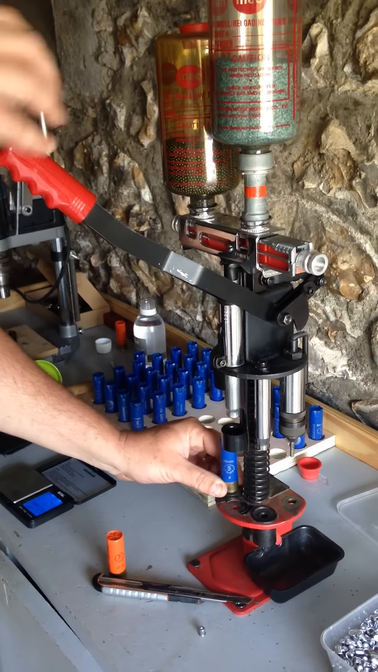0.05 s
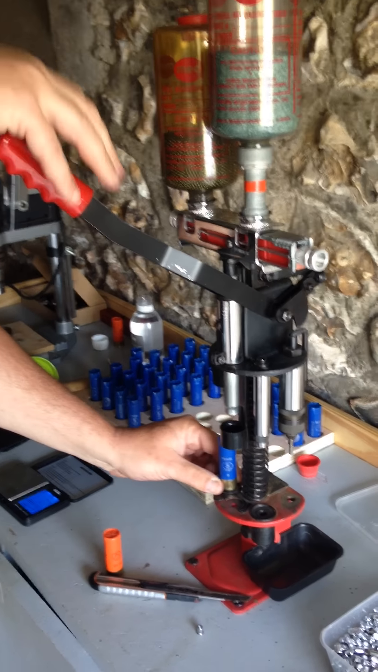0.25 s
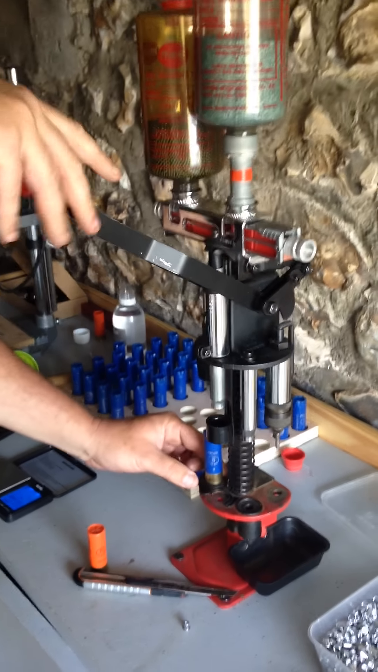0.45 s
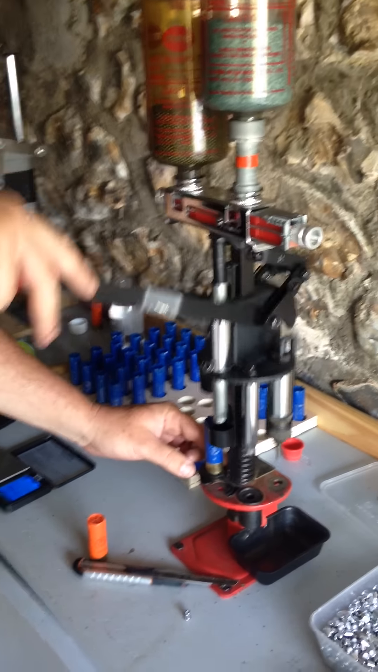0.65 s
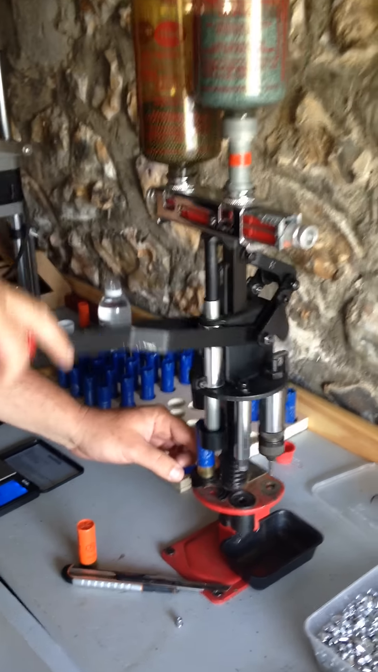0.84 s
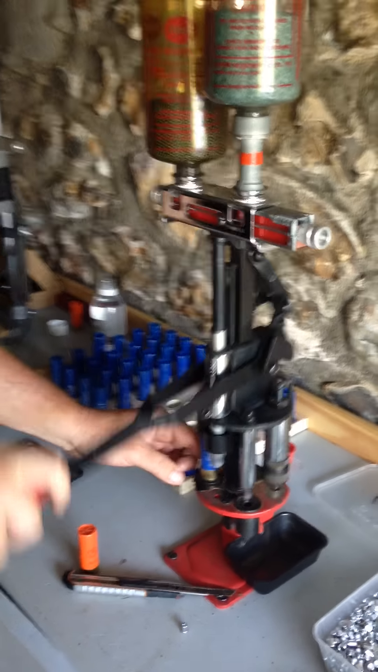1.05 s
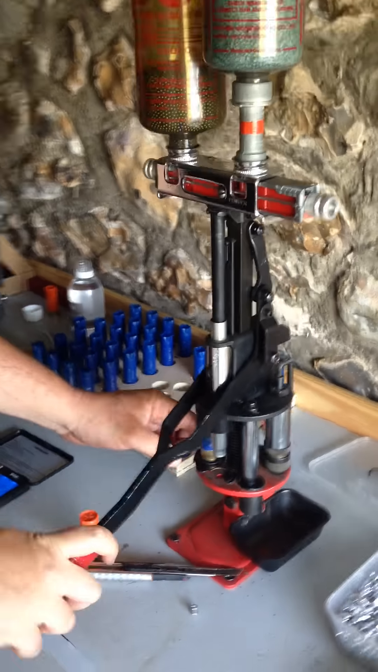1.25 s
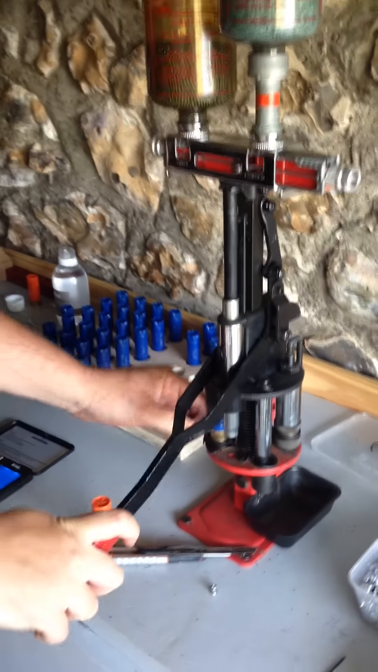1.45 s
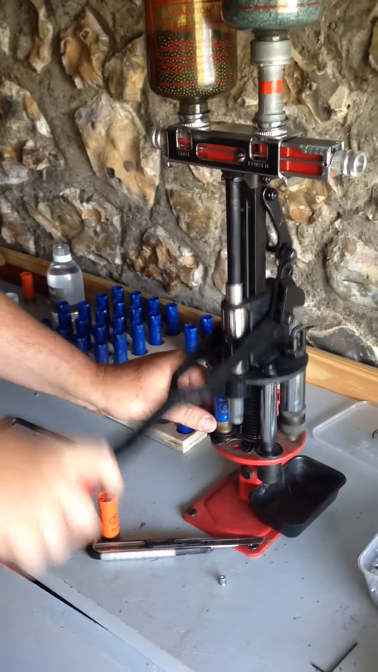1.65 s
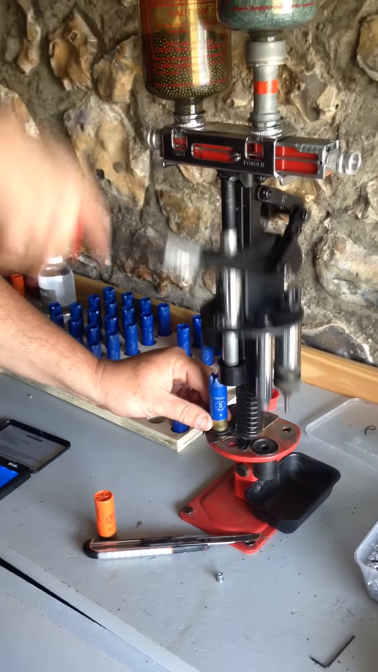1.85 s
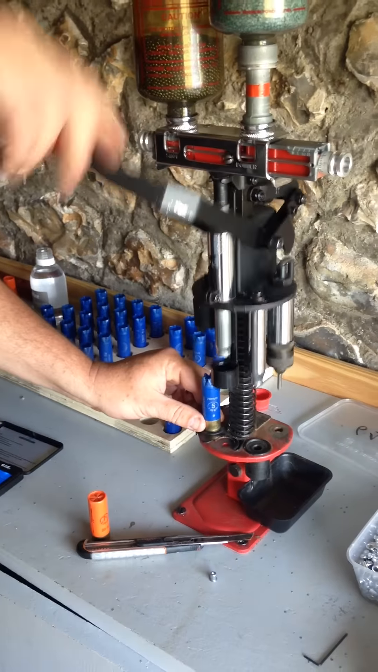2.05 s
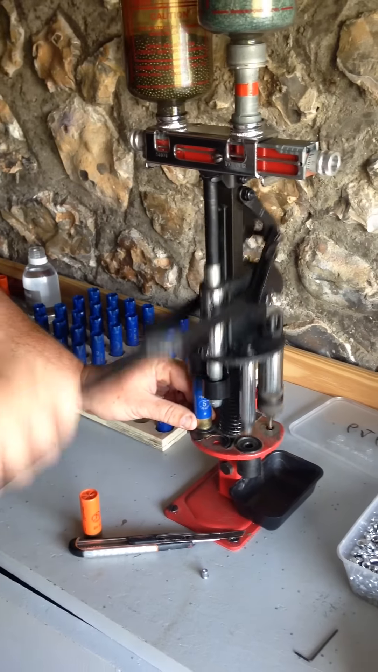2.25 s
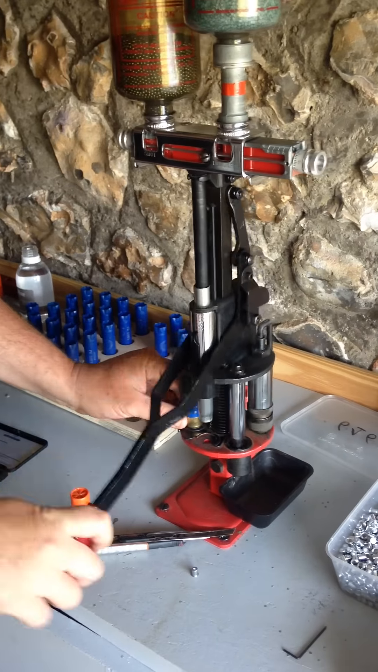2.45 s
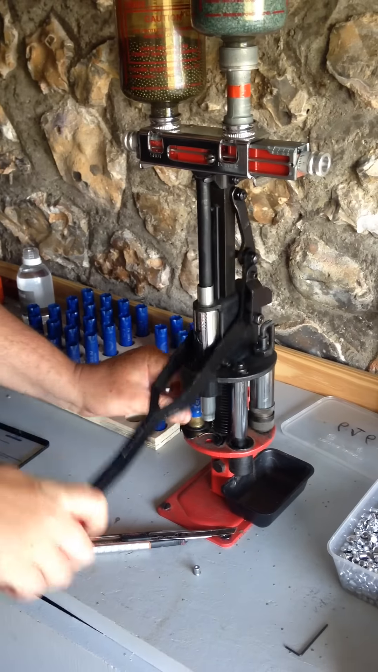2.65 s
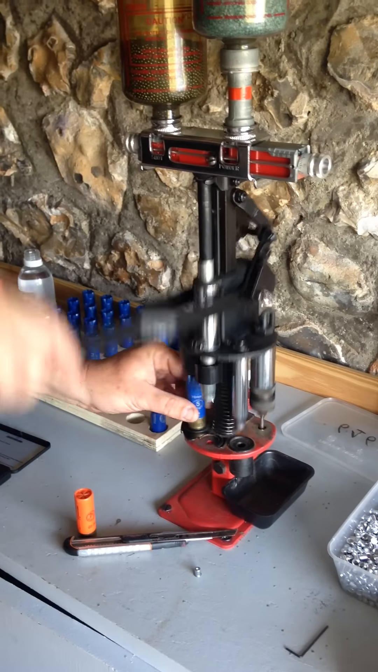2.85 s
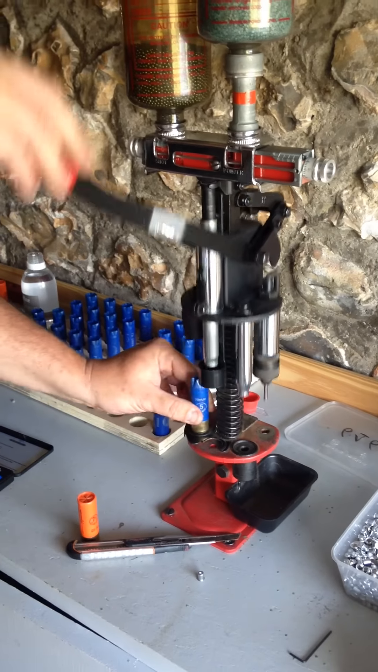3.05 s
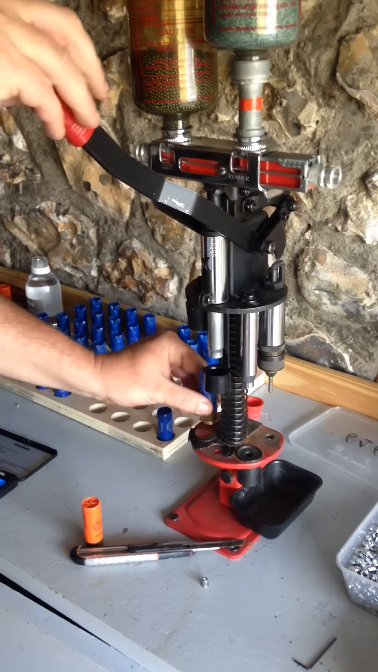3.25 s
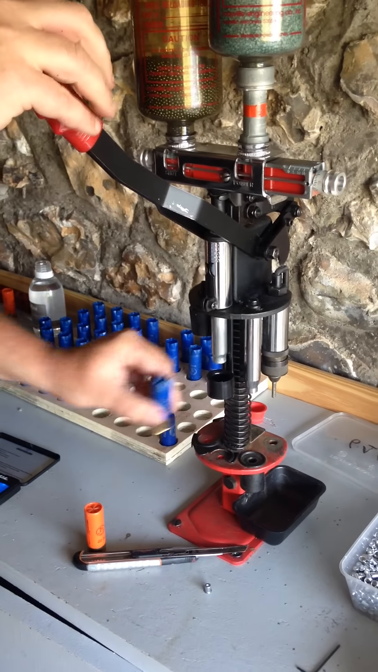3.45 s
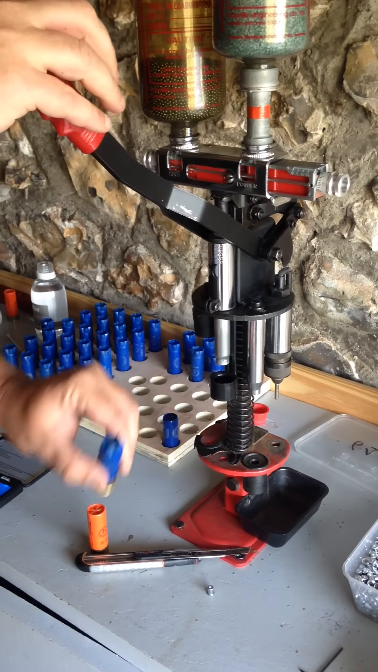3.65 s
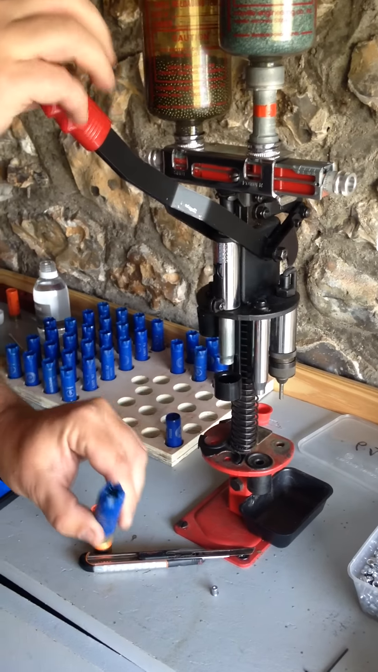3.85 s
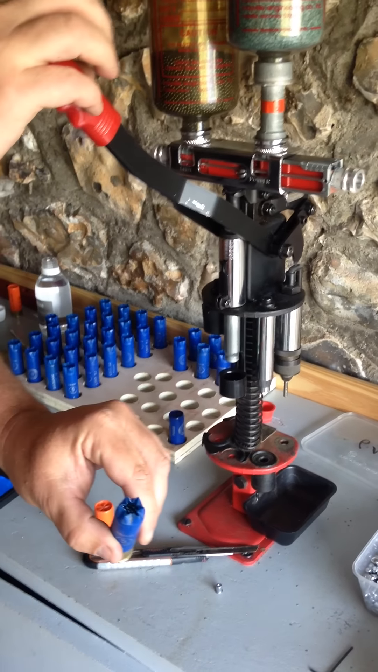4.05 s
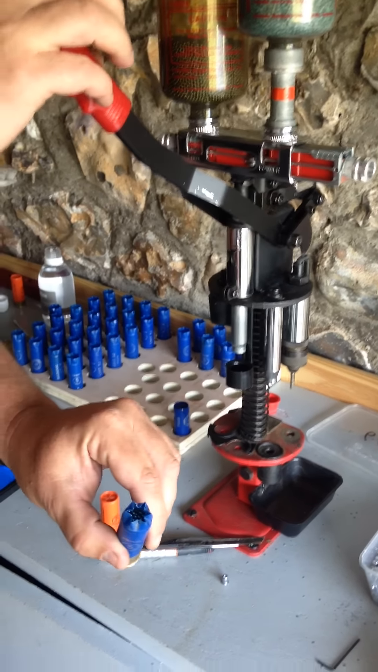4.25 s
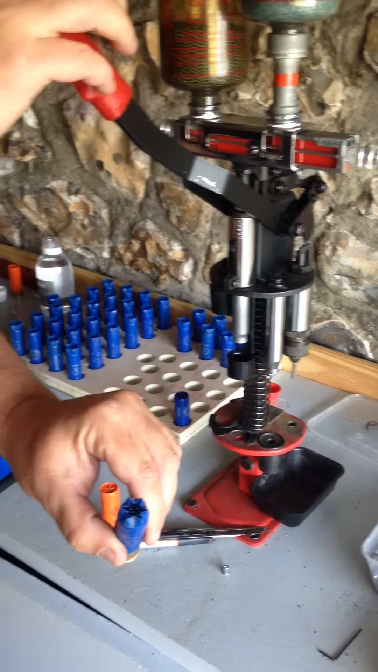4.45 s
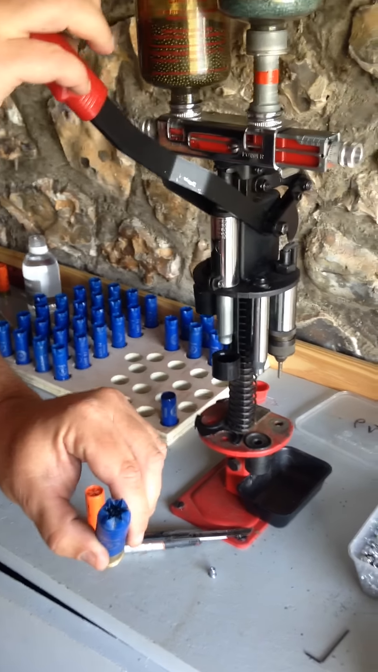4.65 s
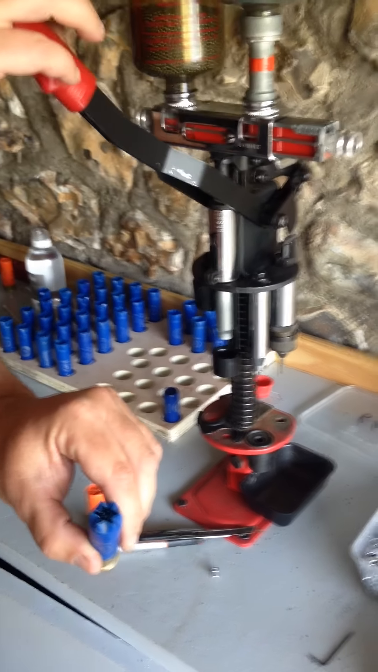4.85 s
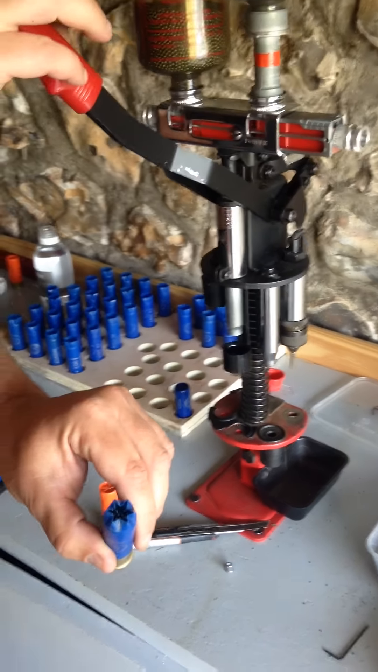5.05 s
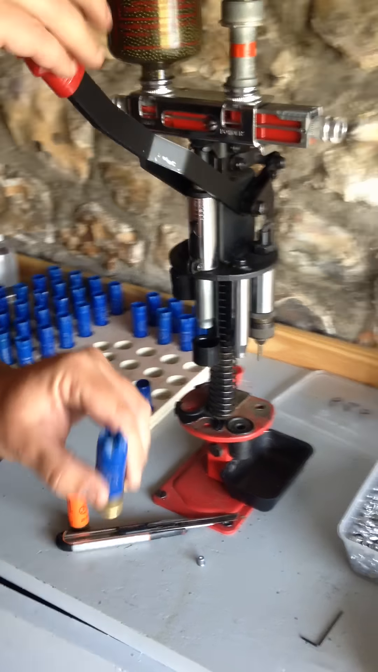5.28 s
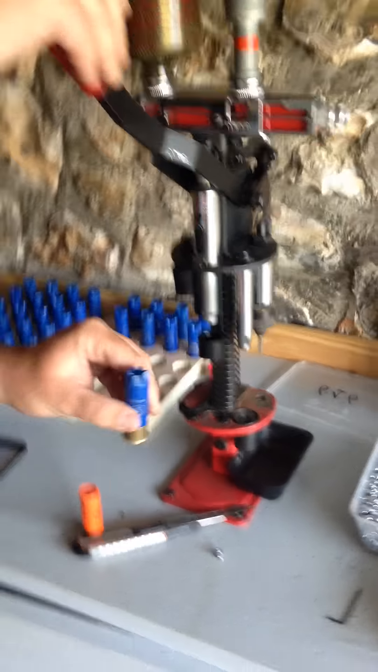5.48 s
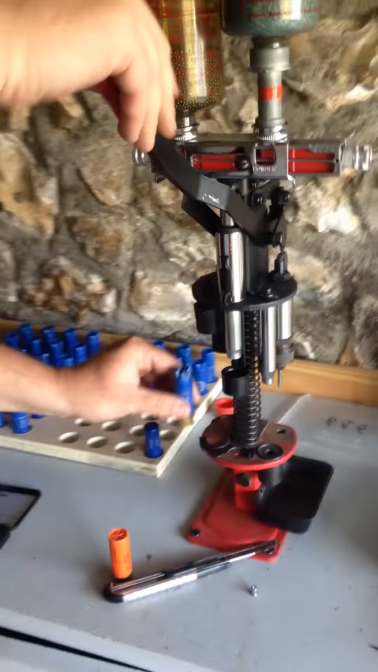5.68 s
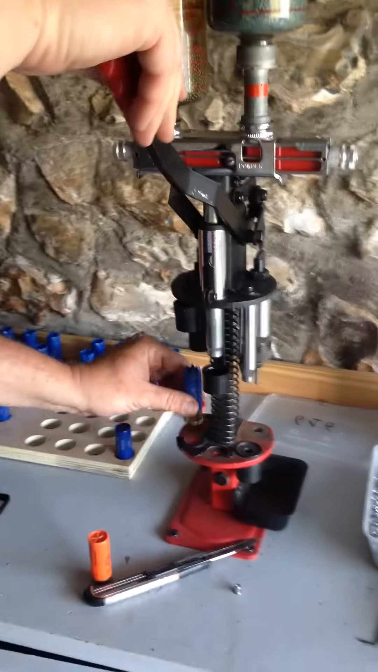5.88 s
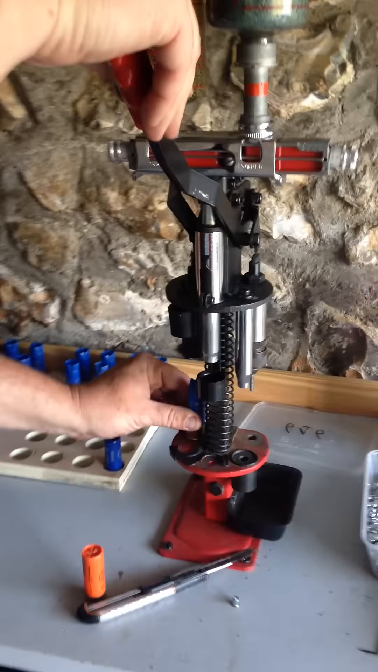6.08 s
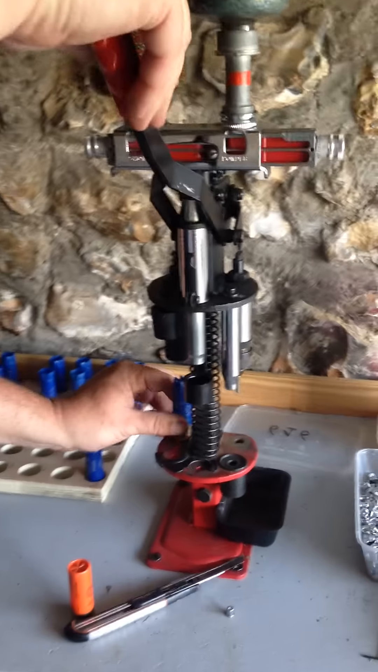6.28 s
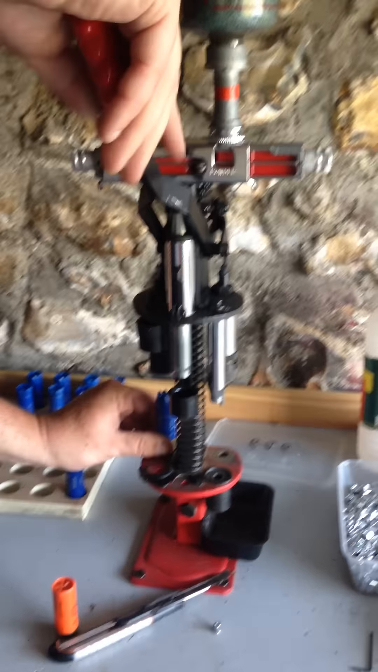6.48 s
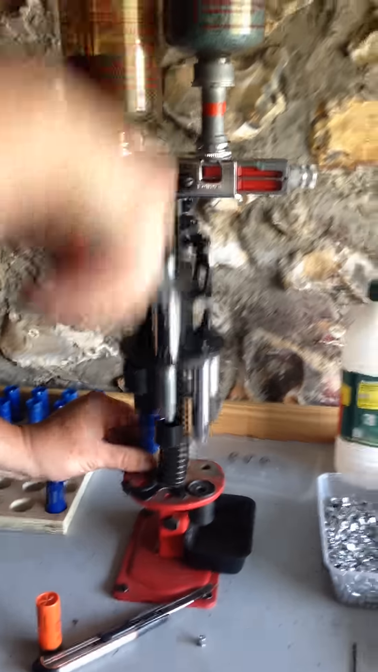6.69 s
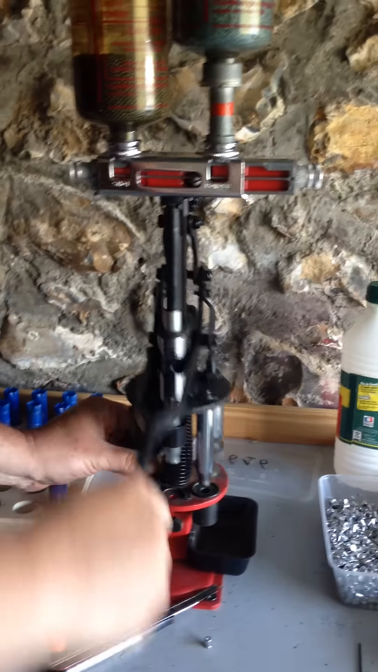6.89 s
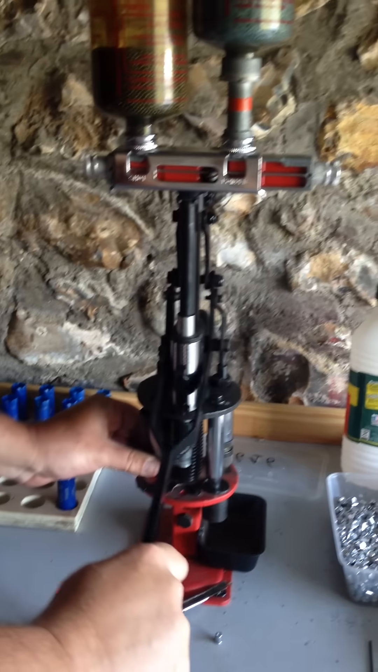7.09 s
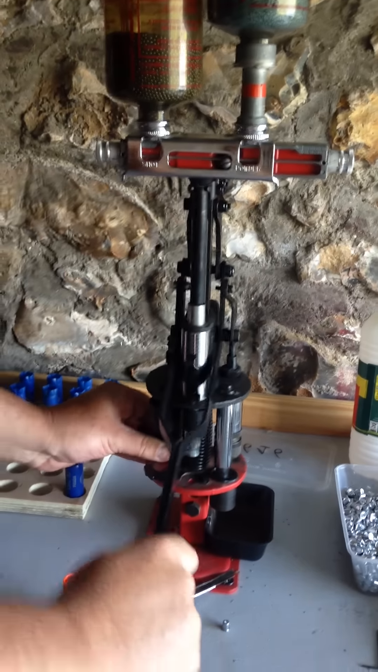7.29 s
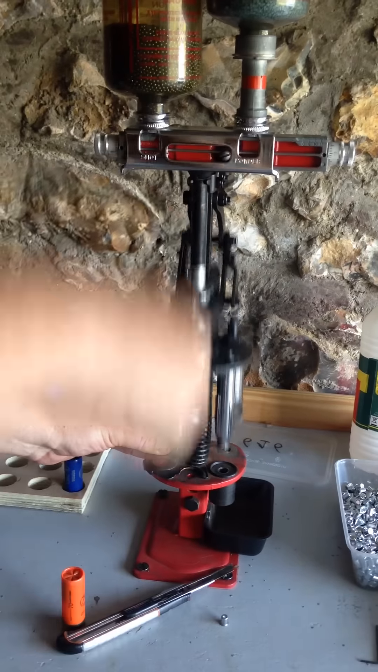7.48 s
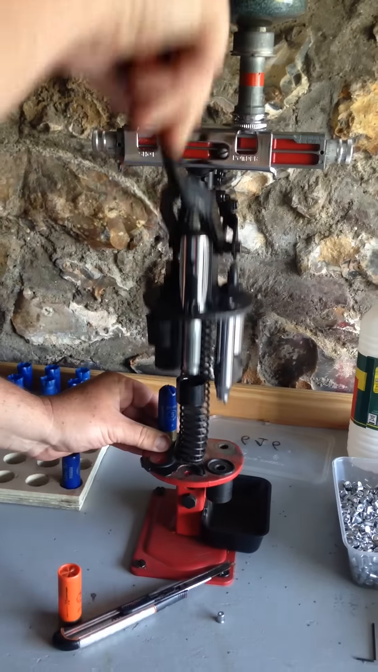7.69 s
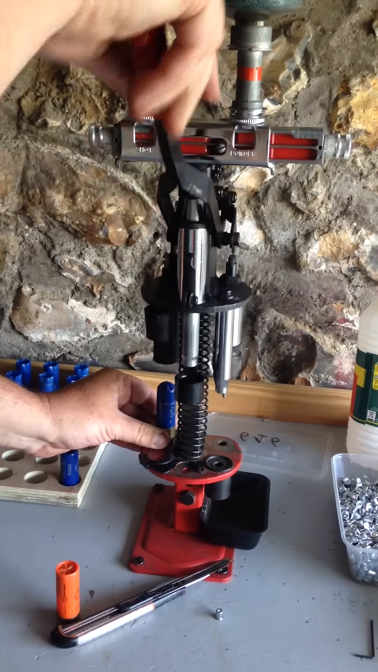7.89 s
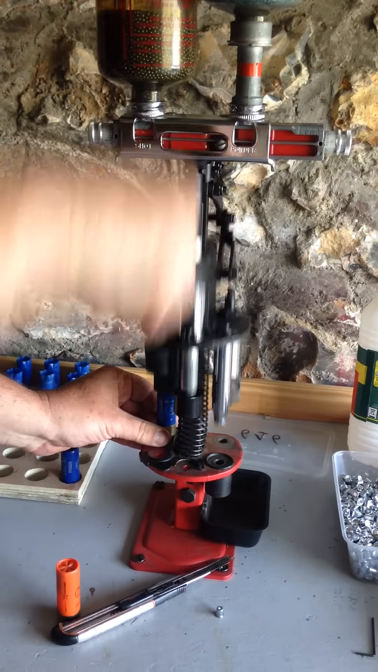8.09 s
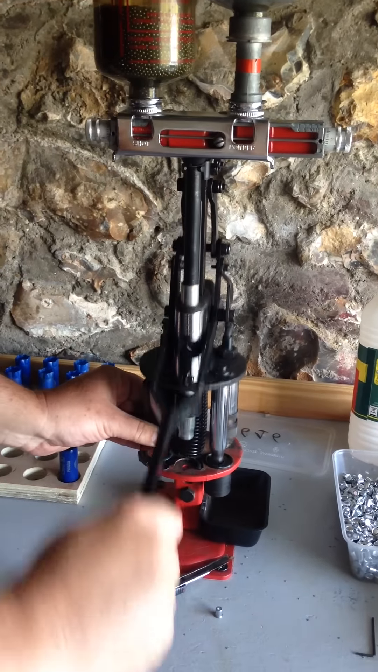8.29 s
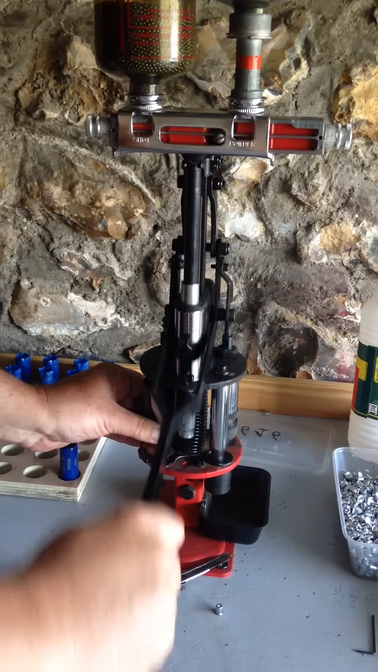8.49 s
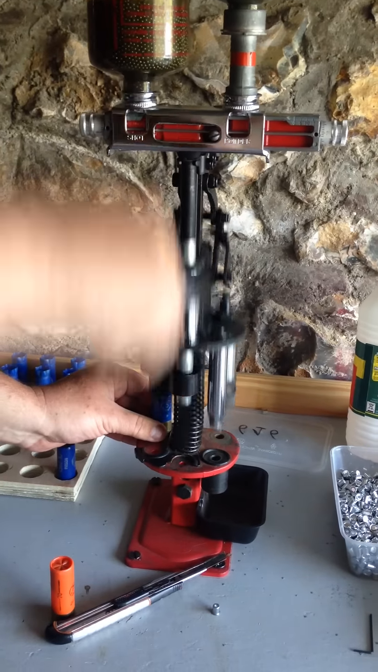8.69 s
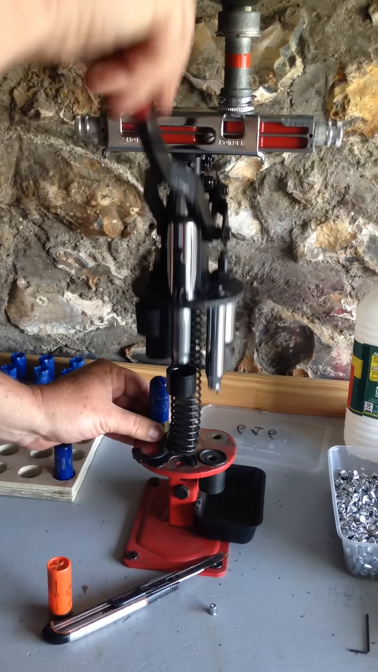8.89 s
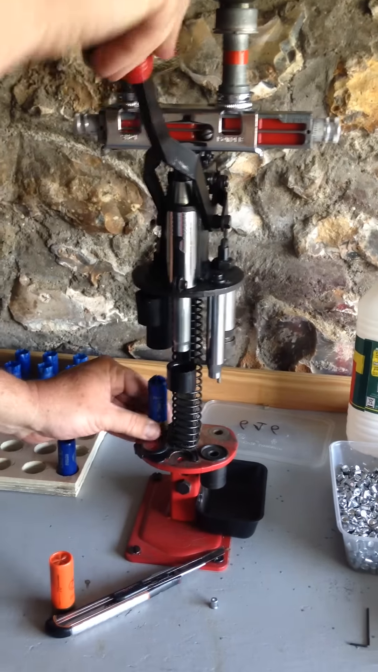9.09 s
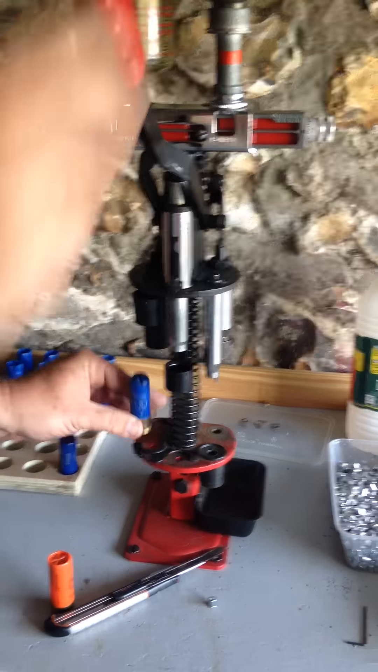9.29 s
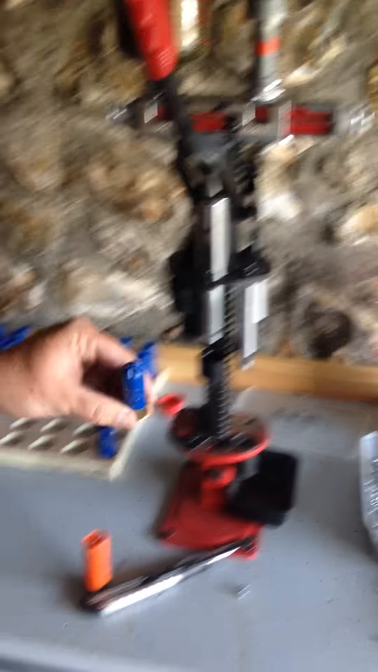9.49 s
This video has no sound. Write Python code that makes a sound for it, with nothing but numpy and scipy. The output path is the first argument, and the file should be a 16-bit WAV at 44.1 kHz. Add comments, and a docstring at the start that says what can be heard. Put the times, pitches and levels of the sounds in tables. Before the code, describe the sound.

Close steel clanks, knocks and rubbing come from a shell press as its lever is pulled and raised twice, pellets rushing briefly down a tube each time. A quieter stretch holds small plastic snaps, bright taps of the shell's metal head and muffled bumps on the microphone. The press then clatters through two more strokes and the lever slams against its upper stop. The workshop sounds fairly dry, with a faint rumble.

```python
"""Shotshell press in a stone workshop

Four lever strokes, close by: the linkage slides, the steel charge bar clanks across, the lever meets
its stop, the bar clinks back and the carriage knocks home. Shot hisses down the drop tube on the first
two. Midway a plastic hull is lifted out, snaps in the fingers, knocks on the tray and is seated again,
while the hand-held microphone is rubbed and bumped on its way to the front. A low rumble lies below."""
import sys
import numpy as np
from scipy import signal
from scipy.fft import rfft, irfft, next_fast_len
from scipy.io import wavfile

SR = 44100
rng = np.random.default_rng(int(sys.argv[2]) if len(sys.argv) > 2 else 0)


def generate_wav(signal):
    """Clip the signal to [-1, 1] and save it as 16-bit WAV at the path in sys.argv[1]."""
    frames = np.transpose(np.atleast_2d(signal))
    scaled = np.clip(frames, -1, 1) * 32767
    pcm = np.round(scaled).astype(np.int16)
    wavfile.write(sys.argv[1], SR, pcm)


N = 420273
TIME = np.arange(N) / SR
SIDE_ON = np.interp(TIME, [3.5, 6], [1, 0])   # microphone position: 1 beside the press, 0 in front


def from_db(db):
    """Decibels to gain."""
    return 10 ** (np.asarray(db) / 20)


def rms(x):
    """Root mean square."""
    return np.sqrt(np.mean(x ** 2) + 1e-20)


def add(track, start_s, sound):
    """Mix a sound into a track."""
    start = max(0, round(start_s * SR))
    track[start:start + len(sound)] += sound[:N - start]


def coloured(x, spectrum):
    """Shape a steady signal with an EQ curve; rms 1."""
    hz, db = np.transpose(spectrum)
    size = next_fast_len(len(x))
    grid_hz = np.maximum(np.fft.rfftfreq(size, 1 / SR), 1)
    curve = from_db(np.interp(np.log(grid_hz), np.log(hz), db))
    y = irfft(rfft(x, size) * curve, size)[:len(x)]
    return y / rms(y)


# Borders of three registers, the bench's thud, the frame's body and the small parts' edge: border_hz
REGISTERS = [110, 500, 2200, 16000]
def register(x, k):
    """The part of a steady noise in register k, with sloping borders; rms 1."""
    hz = np.maximum(np.fft.rfftfreq(len(x), 1 / SR), 1)
    power = 1 / (1 + (REGISTERS[k] / hz) ** 10) / (1 + (hz / REGISTERS[k + 1]) ** 10)
    y = irfft(rfft(x) * np.sqrt(power), len(x))
    return y / rms(y)


def resonance(x, hz, q):
    """What a resonance passes of x; gain 1 at its centre."""
    return signal.lfilter(*signal.iirpeak(hz, q, fs=SR), x)


def with_decay(impulses, decay_s):
    """Give every impulse an exponential tail."""
    return signal.lfilter([1], [1, -np.exp(-1 / (decay_s * SR))], impulses + 1e-18)


def swell(at_s, db, rise_db_per_s, fall_db_per_s, hold_s=0, growth_db=0):
    """Gain that rises until at_s, holds (growing or sagging about db) and dies away."""
    t = TIME - at_s
    along = np.clip(t / max(hold_s, 1 / SR), 0, 1) - .5
    flanks_db = rise_db_per_s * np.minimum(t, 0) - fall_db_per_s * np.maximum(t - hold_s, 0)
    return from_db(np.maximum(db + growth_db * along + flanks_db, -200))


def unsteady(hz):
    """Smooth random wavering up to hz; rms 1."""
    return coloured(rng.standard_normal(N), [(hz / 5, 0), (hz, -3), (4 * hz, -50), (20 * hz, -100)])


def grains(per_s, spread_db, clump_db):
    """Tiny impacts of very uneven size, bunched as the parts stick and slip."""
    sizes = from_db(spread_db * np.minimum(rng.exponential(1, N), 4) + clump_db * unsteady(hz=50))
    return (rng.random(N) < per_s / SR) * rng.choice([-1, 1], N) * sizes


# EQ curves of the room tone's three layers: freq_hz, gain_db
RUMBLE_EQ = [(20, -46), (45, -9), (72, 13.5), (110, -6.5), (280, -8), (450, -48.5)]
RUSH_EQ = [(300, 0), (480, -7), (640, -1), (800, -7), (1130, 0), (1450, -11), (1800, -13), (16000, -55)]
HISS_EQ = [(2000, 26), (5000, -23.5), (7300, 4.5), (7600, 31.5), (7900, -14.5), (16000, -1.5)]
def background():
    """Low rumble, a dull rush that swells once, and faint hiss with a thin steady whistle."""
    white = rng.standard_normal((3, N))
    surge = swell(4.5, -54, rise_db_per_s=12.5, fall_db_per_s=29, hold_s=.82, growth_db=5)
    rumble = from_db(-55.5) * coloured(white[0], RUMBLE_EQ)
    rush = np.hypot(from_db(-63.5), surge) * coloured(white[1], RUSH_EQ)
    hiss = from_db(-72) * coloured(white[2], HISS_EQ)
    return rumble + rush + hiss


# Reverb time of each register, low to high: t60_s
ROOM_T60_S = [0.31, 0.19, 0.18]
def workshop(x, wet_db):
    """Rough stone walls scatter the sound into a short tail; the treble dies first."""
    t = TIME[:32768]
    white, response = rng.standard_normal(len(t)), 0
    onset = np.clip((t - .004) / .0023, 0, 1)
    for k, t60_s in enumerate(ROOM_T60_S):
        tail = register(white, k) * from_db(-60 * t / t60_s) * onset
        share = (REGISTERS[k + 1] - REGISTERS[k]) / (SR / 2)
        response = response + from_db(wet_db[k]) * tail * np.sqrt(share / np.sum(tail ** 2))
    return signal.fftconvolve(x, response)[:N]


# Soft rolls of the palm against the microphone's case: peak_s, level_db
PALM_ROLLS = [(5.39, -45), (5.97, -39), (6.475, -35)]
# Bumps as the grip slips: start_s, relative_db, pitch_hz
GRIP_BUMPS = [(5.518, -24, 112), (5.547, -24, 165), (5.581, -29, 125), (6.498, -21, 154)]
# EQ curves of the muffled palm and of fingers on the case: freq_hz, gain_db
PALM_EQ = [(120, 0), (900, -60)]
CASE_EQ = [(30, -20), (70, 3), (270, 6), (420, -9), (3000, -47.5)]
def handling():
    """A hand rolls and rubs on the microphone's case; a bump is one heavily damped low swing."""
    t = TIME[:SR // 8]
    rolls = sum(swell(peak_s, db, rise_db_per_s=190, fall_db_per_s=240) for peak_s, db in PALM_ROLLS)
    grip = rolls * coloured(rng.standard_normal(N), PALM_EQ)
    for start_s, db, hz in GRIP_BUMPS:
        cycles = hz * t
        envelope = from_db(db + 3.5 - 60 * cycles / 5.9) * np.minimum(2 * cycles, 1)
        add(grip, start_s, envelope * np.sin(2 * np.pi * cycles))
    carry = swell(5.37, -44.5, rise_db_per_s=32, fall_db_per_s=40)
    fingers = carry * coloured(grains(per_s=300, spread_db=2.5, clump_db=2), CASE_EQ)
    return fingers + signal.sosfilt(signal.butter(2, [50, 420], "band", fs=SR, output="sos"), grip)


# Low booms as the lever's load comes on or off the bench: start_s, relative_db
SWAYS = [(1.36, -40), (2.616, -40.5), (2.747, -41), (2.89, -45), (7.53, -43), (8.621, -44.5), (9.085, -43),
         (9.206, -45.5)]
def bench_sway(pitch_hz=71, t60_s=.42):
    """The loaded bench top swings in its lowest mode after a push."""
    t, out = TIME[:SR], np.zeros(N)
    attack = 1 - np.exp(-t / .0034)
    for start_s, db in SWAYS:
        hz = pitch_hz * (1 + .0087 * rng.standard_normal())
        add(out, start_s, from_db(db + 12 - 60 * t / t60_s) * attack * np.sin(2 * np.pi * hz * t))
    return out


def stick_slip(rows, spectrum, slips_per_s, q, slip_s, focus_db=9):
    """Short runs of unevenly spaced slips; every slip is a tiny dying burst that rings the part."""
    t, out = TIME[:8192], np.zeros(N)
    for start_s, length_s, db, hz in rows:
        slips_s = np.cumsum(rng.uniform(.5, 1.5, 200)) / slips_per_s
        slips_s -= slips_s[0]
        fade = np.clip((length_s - slips_s) * slips_per_s, 0, 1)
        sizes = from_db(3 * rng.standard_normal(len(slips_s))) * fade
        force = np.bincount((slips_s * SR).astype(int), sizes, len(t))[:len(t)]
        sound = with_decay(force, slip_s) * coloured(rng.standard_normal(len(t)), spectrum)
        sound = sound + from_db(focus_db) * resonance(sound, hz, q)
        add(out, start_s, from_db(db) * sound / rms(sound) * np.sqrt(length_s / t[-1]))
    return out


# Low creaks and high, gritty rasps: start_s, length_s, level_db, resonance_hz
CREAKS = [(1.514, .03, -40, 810), (1.629, .028, -43, 590), (2.288, .022, -41, 690), (2.69, .018, -40, 760),
          (7.094, .022, -38, 490), (8.596, .036, -41, 770), (8.908, .028, -44, 480)]
RASPS = [(1.965, .06, -44, 2600), (4.742, .08, -48.5, 1900)]
# EQ curves of the pivots and the spring's coils: freq_hz, gain_db
PIVOT_EQ = [(120, -22), (380, 0), (850, -1), (1100, -9), (9000, -36)]
COILS_EQ = [(800, -22), (2500, 0), (15000, -13)]
def linkage():
    """Dry pivots creak under load; coils rasp on the column, or a fingernail on the hull's crimp."""
    creaks = stick_slip(CREAKS, PIVOT_EQ, slips_per_s=230, q=5, slip_s=.004)
    rasps = stick_slip(RASPS, COILS_EQ, slips_per_s=170, q=9, slip_s=.0016)
    return creaks + rasps


# The carriage runs down and up, four times: start_s, length_s, rub_db, shot_db, growth_db
TRAVELS = [(0.96, 0.26, -43, -56.5, 16), (1.699, 0.21, -41.5, -50, 1), (2.21, 0.12, -43.5, -41.5, -2),
           (2.898, 0.2, -42, -56, 1.5), (6.8, 0.3, -44.5, -52.5, -16), (7.538, 0.16, -37.5, -47.5, 1.5),
           (8.143, 0.17, -39, -53.5, 4.5), (8.68, 0.24, -39.5, -51.5, -0.5)]
# Two charges run down the drop tube, each followed by a remnant: peak_s, shot_db
POURS = [(1.371, -29), (1.565, -43.5), (2.58, -34), (2.763, -44)]
# The hull scrapes against dies and fingers: peak_s, rub_db, shot_db
SCRAPES = [(2.003, -30.5, -41), (2.52, -25, -60), (2.745, -36.5, -61), (3.231, -45.5, -52),
           (4.785, -42, -52), (5.33, -46.5, -56.5), (6.111, -42, -57.5)]
def movement():
    """Relative envelopes of the carriage's travel, the hull's scraping and the shifting shot."""
    travel, scrape, shot = 0, from_db(-66), from_db(-71.5)   # the hands never keep quite still
    shot += sum(swell(peak_s, db, rise_db_per_s=1203, fall_db_per_s=288) for peak_s, db in POURS)
    for start_s, length_s, rub_db, shot_db, growth_db in TRAVELS:
        shape = swell(start_s, 0, 224, 143, hold_s=length_s, growth_db=growth_db)
        travel += from_db(rub_db) * shape
        shot += from_db(shot_db) * shape
    for peak_s, rub_db, shot_db in SCRAPES:
        shape = swell(peak_s, 0, rise_db_per_s=190.5, fall_db_per_s=290)
        scrape += from_db(rub_db) * shape
        shot += from_db(shot_db) * shape
    return travel, scrape, shot


def loose_pins():
    """Chattering pins ring the charge bar's modes, mostly the low ones, damped by its seat; rms 1."""
    knocks = grains(per_s=90, spread_db=3, clump_db=5) + 1e-18
    ring = sum((-1) ** k * from_db(db) * resonance(knocks, hz, q=9) / hz
               for k, (hz, db, _) in enumerate(BAR_MODES))
    return ring / rms(ring)


# EQ curves of the dull rub and the bright hiss of shot: freq_hz, gain_db
RUB_EQ = [(110, -4), (330, 2.5), (480, -2.5), (1200, -2), (1900, -3.5), (5000, -25)]
SHOT_EQ = [(1500, -30.5), (3300, 2.5), (4900, 4), (6500, -2.5), (15300, -8)]
def sliding():
    """Rough guides rub in fits and starts, the return spring sings, pins rattle and shot shifts."""
    travel, scrape, shot = movement()
    stutter = from_db(2.2 * unsteady(hz=20))
    friction = coloured(grains(per_s=3000, spread_db=2.5, clump_db=2), RUB_EQ)
    spring_db = 9.5 - 2 * SIDE_ON   # from the side, the frame hides the spring
    spring = from_db(spring_db) * resonance(friction, hz=1451, q=42)
    guides = from_db(-8) * ((travel + scrape) * friction + travel * spring)
    pellets = from_db(-3.5) * shot * coloured(grains(per_s=7400, spread_db=1.5, clump_db=3), SHOT_EQ)
    pins = from_db(-12.5) * travel * loose_pins()
    return stutter / rms(stutter) * (guides + pellets + pins)


def rebounds(loose_db, size, per_s=260, fall_db_per_s=520, spread_db=5):
    """Force of a loose part rattling after a blow: a dying run of unevenly spaced touches."""
    touches_s = np.cumsum(rng.uniform(.2, 1.8, 20)) / per_s
    force = from_db(loose_db - fall_db_per_s * touches_s + spread_db * rng.uniform(-1, 1, 20))
    return np.bincount((touches_s * SR).astype(int), force, size)[:size]


def ringing(t, modes, k, resonances_hz, lift_db=5, lift_octaves=.07):
    """A struck part's modes in register k; those near the blow's resonances ring louder."""
    ring = np.zeros(len(t))
    for hz, db, t60_s in modes:
        if REGISTERS[k] <= hz < REGISTERS[k + 1]:
            loaded_hz = hz * (1 + .0028 * rng.standard_normal())   # the load detunes it a little
            nearness = np.exp(-(np.log2(np.divide(resonances_hz, hz)) / lift_octaves) ** 2).max()
            struck_db = db + lift_db * nearness + 2 * rng.standard_normal()   # the contact point varies
            envelope = from_db(struck_db - 60 * t / t60_s)
            ring += envelope * np.sin(2 * np.pi * (loaded_hz * t + rng.random()))
    return ring


def blows(rows, spectrum, modes, ring_db, t60_s, contact_s, crack_db, focus_db, loose_db=-15):
    """Each blow is a crack and a rattle over a dense, fast-dying ring with the part's modes on top."""
    t, out = TIME[:16384], np.zeros(N)
    head = round(.02 * SR)   # the first 20 ms set the levels
    crack = from_db(crack_db) * np.exp(-(t / contact_s) ** 2)
    for start_s, thud_db, body_db, edge_db, *resonances_hz in rows:
        noise, sound = coloured(rng.standard_normal(len(t)), spectrum), 0
        # the lever's position decides which broad resonances answer most
        noise = noise + from_db(focus_db) * sum(resonance(noise, hz, q=9) for hz in resonances_hz)
        force = rebounds(loose_db, len(t))
        clatter = (1 + crack[0]) * with_decay(force, decay_s=.002)
        for k, level_db in enumerate((thud_db, body_db, edge_db)):
            dense = register(noise, k) * np.hypot(from_db(-60 * t / t60_s[k]) + crack, clatter)
            ring = ringing(t, modes, k, resonances_hz)
            ring = ring + signal.fftconvolve(ring, force)[:len(t)]   # every rebound disturbs the modes
            layer = dense / rms(dense[:head]) + from_db(ring_db) * ring / rms(ring[:head])
            attack_s = .0015 + .25 / REGISTERS[k]   # heavy parts get moving later
            layer *= 1 - np.exp(-(t / attack_s) ** .84)
            sound = sound + from_db(level_db) * layer / rms(layer[:head])
        add(out, start_s, sound)
    return out


# Dry plastic snaps under a finger, then a dull knock of the hull on the tray:
# start_s, thud_db, body_db, edge_db, resonance_hz
SNAPS_AND_KNOCK = [(4.791, -60, -52, -46, 2200), (4.823, -50, -38, -42, 2100),
                   (4.8455, -43, -36, -38, 2150), (5.857, -41, -53, -62, 300)]
# Bright taps of the hull's head in its station: start_s, thud_db, body_db, edge_db, resonance_hz
SEATINGS = [(6.013, -54, -40.5, -41.5, 1920), (6.1705, -71, -40.5, -40, 2680), (6.204, -64, -62, -46, 5000),
            (6.3935, -56, -48.5, -37.5, 4960)]
# EQ curves of the hull's tube and head: freq_hz, gain_db
PLASTIC_EQ = [(400, -8), (900, -14.5), (2150, -7), (4000, -16), (16000, -36)]
BRASS_EQ = [(110, -20), (1900, -0.5), (5000, 3), (16000, -20)]
def hull():
    """The damped plastic tube snaps, then knocks on the tray; its metal head taps home and rings."""
    tube = blows(SNAPS_AND_KNOCK, PLASTIC_EQ, modes=[], ring_db=-12, t60_s=[.06, .03, .03],
                 contact_s=.005, crack_db=4, focus_db=5.5, loose_db=-12)
    seatings = blows(SEATINGS, BRASS_EQ, modes=[(1930, 0, .13)], ring_db=-20, t60_s=[.1, .06, .04],
                     contact_s=.003, crack_db=4, focus_db=1, loose_db=-24)
    return tube + seatings


# Small ticks between the big hits: start_s, body_db, edge_db, resonance_hz
TICKS = [(0.447, -35, -46.5, 564), (0.556, -43, -55, 589), (1.071, -43, -50, 560), (1.097, -42, -53, 900),
         (1.136, -36, -41, 570), (1.16, -39, -45, 1500), (1.334, -39, -45, 566), (1.477, -39, -56, 694),
         (1.548, -38, -45.5, 686), (1.711, -35, -43, 1100), (2.123, -39, -47, 584),
         (2.707, -37, -44.5, 1200), (4.128, -46, -69, 660), (5.84, -54, -60, 1700), (6.981, -40, -50, 363),
         (7.093, -43, -47, 1400), (7.153, -42.5, -46, 1070), (7.394, -43, -46, 2510),
         (7.682, -42.5, -54, 1450), (7.994, -44, -56, 1960), (8.338, -44, -46.5, 1450),
         (8.647, -38, -44, 616), (9.192, -41.5, -53.5, 1510), (9.299, -50, -66, 1440)]
def light_contacts():
    """Linkage and hull touch lightly and sound the bench and frame, with little thud."""
    rows = [(start_s, body_db - 6, body_db, edge_db, hz) for start_s, body_db, edge_db, hz in TICKS]
    return blows(rows, BENCH_EQ, FRAME_MODES, ring_db=-12, t60_s=[.11, .09, .06],
                 contact_s=.008, crack_db=3, focus_db=5)


# Midrange knocks: start_s, thud_db, body_db, edge_db, one or more resonance_hz
KNOCKS = [(0.6915, -37.5, -24, -35.5, 650), (1.832, -35, -26.5, -32, 665, 2400),
          (2.2215, -33, -26, -32, 660, 980), (2.9195, -40, -23.5, -32, 726, 1150, 2420),
          (6.764, -38.5, -30, -38, 1350), (7.562, -37, -31, -41, 1240), (8.1265, -39, -36, -39.5, 1210),
          (8.729, -34, -23, -32, 824, 1230)]
# EQ curve of the frame's dense ring: freq_hz, gain_db
FRAME_EQ = [(110, -1), (440, -13), (700, -0.5), (1200, -3.5), (2000, -10.5), (3500, -18.5), (12000, -21.5),
            (16000, -29)]
# The frame's modes: pitch_hz, gain_db, t60_s
FRAME_MODES = [(177, -2.5, 0.4), (345, -0.5, 0.2), (655, -2, .05), (970, -5, .055), (1160, -2, .05),
               (2430, 0, .045), (4400, -3, .04)]
def carriage():
    """The carriage takes up its play and knocks the frame."""
    return blows(KNOCKS, FRAME_EQ, FRAME_MODES, ring_db=-11, t60_s=[.1, .065, .05],
                 contact_s=.008, crack_db=8, focus_db=4, loose_db=-13)


# Heavy hits on the lever's stops: start_s, thud_db, body_db, edge_db, one or more resonance_hz
BOTTOM_STOPS = [(1.347, -30.5, -26.5, -33, 560), (2.5565, -29.5, -27.5, -31, 580)]
TOP_SLAMS = [(9.0772, -23, -19, -35, 320, 760)]
# EQ curves of the bench and of the whole press thudding: freq_hz, gain_db
BENCH_EQ = [(110, 3.5), (380, -4.5), (4200, -13), (16000, -36)]
THUD_EQ = [(110, 10.5), (350, -8), (950, -7), (1700, -19), (4200, -22), (16000, -46)]
# The bench's modes: pitch_hz, gain_db, t60_s
BENCH_MODES = [(200, 4, 0.093), (335, 0, .15), (760, 0, 0.05)]
def lever():
    """The lever bottoms out and shakes the bench; at the end it is let go against its upper stop."""
    stops = blows(BOTTOM_STOPS, BENCH_EQ, BENCH_MODES, ring_db=-7.5, t60_s=[.15, .11, .05],
                  contact_s=.0059, crack_db=20.5, focus_db=-7)
    slams = blows(TOP_SLAMS, THUD_EQ, BENCH_MODES, ring_db=-9.5, t60_s=[.13, .1, .05],
                  contact_s=.0073, crack_db=16.5, focus_db=10)
    return stops + slams


# Hard clanks and thin clinks: start_s, thud_db, body_db, edge_db, one or more resonance_hz
CLANKS = [(1.1815, -35, -28, -20.5, 2400, 6010, 6900), (1.2335, -37, -26, -31.5, 1110, 2630),
          (2.4248, -36, -28.5, -19.5, 4300, 3060, 7420), (2.4675, -41, -28.5, -32, 1150),
          (6.9425, -48, -46.5, -36.5, 5400), (7.0255, -44, -28, -29.5, 2450, 1800, 6010),
          (8.3615, -42, -26.5, -23.5, 1430, 4250), (8.396, -50, -32, -42, 1430),
          (8.428, -40, -32, -34.5, 1900)]
CLINKS = [(1.7945, -40, -31.5, -29.5, 740.0), (2.179, -57, -56, -36, 3700),
          (2.8745, -38.5, -34.5, -29, 7560), (7.5095, -39.5, -33.5, -29.5, 3770),
          (8.6685, -35.5, -37, -30.0, 3940.0)]
# EQ curves of the dense ring of bar and latch: freq_hz, gain_db
STEEL_EQ = [(600, 1.5), (2400, -4.5), (3500, -8.5), (7700, -7.5), (9500, -16), (16000, -24.5)]
LATCH_EQ = [(110, 15.5), (450, -6.5), (3000, -7), (5200, -3), (6700, -17.5), (7600, -6.5), (9100, -30),
            (16000, -25)]
# Modes of bar and latch: pitch_hz, gain_db, t60_s
BAR_MODES = [(560, -6, .09), (1115, -11, .12), (1430, 0, .11), (1850, -9, .09), (2420, 0, .065),
             (2630, -2, .075), (3080, -6, .06), (4230, -4, .07), (6005, -3, .09), (6890, -7, .08),
             (8545, -9, .1)]
LATCH_MODES = [(4150, -12, .1), (7560, 5, 0.06), (8600, -9, .1)]
def charge_bar():
    """The steel bar is thrown across, clanks and bounces, then springs back with a clink."""
    clanks = blows(CLANKS, STEEL_EQ, BAR_MODES, ring_db=-8.5, t60_s=[.12, .09, .055],
                   contact_s=.009, crack_db=5, focus_db=1, loose_db=-7)
    clinks = blows(CLINKS, LATCH_EQ, LATCH_MODES, ring_db=-12, t60_s=[.12, .075, .045],
                   contact_s=.0027, crack_db=-3.5, focus_db=1.5)
    return clanks + clinks


# Directional resonances of the press: centre_hz, q, side_db, front_db
BEAMS = [(640, 3.5, 3.5, -5), (320, 6, 1, 4.5)]
def towards_microphone(x):
    """The press beams its broad resonances, so its tone shifts as the microphone moves round it."""
    for hz, q, side_db, front_db in BEAMS:
        gain = from_db(front_db + (side_db - front_db) * SIDE_ON)
        x = x + (gain - 1) * resonance(x, hz, q)
    return x


def scene():
    """The press and hull in the room, over the bench's sway, handling noise and room tone."""
    press = charge_bar() + carriage() + lever() + light_contacts() + sliding() + linkage()
    shell = hull()
    direct = towards_microphone(press) + shell
    to_walls = press + from_db(-4) * shell   # the hull is nearer the microphone
    reverb = workshop(to_walls, wet_db=[-5, -6.5, -7.5])
    return (direct + reverb + bench_sway() + handling() + background())[None]


def record(dry):
    """A steep low-pass cuts the top above 15.8 kHz."""
    return signal.sosfilt(signal.ellip(10, .1, 70, 15800, fs=SR, output="sos"), dry)


dry = scene()
out = record(dry)
generate_wav(out)
```